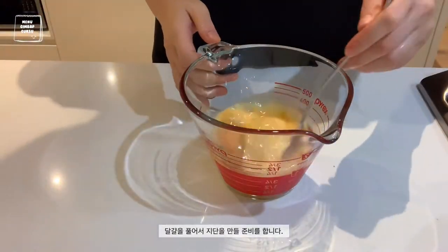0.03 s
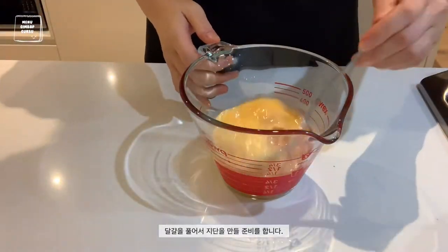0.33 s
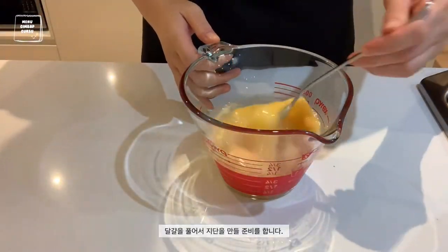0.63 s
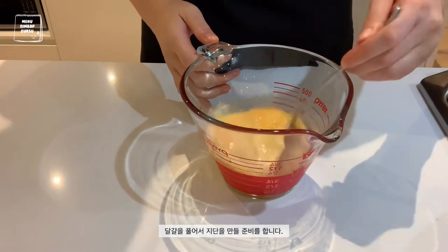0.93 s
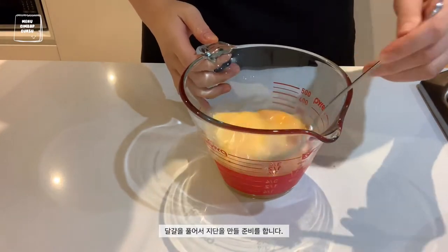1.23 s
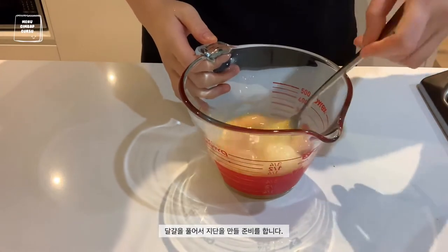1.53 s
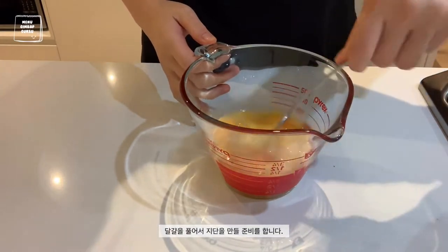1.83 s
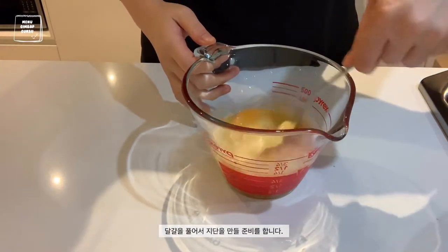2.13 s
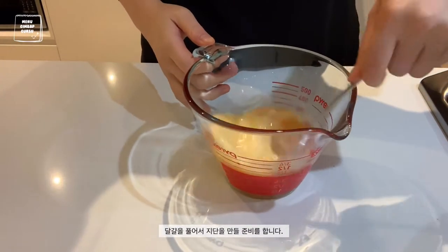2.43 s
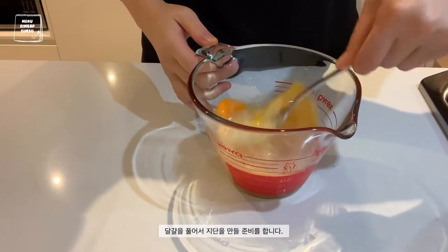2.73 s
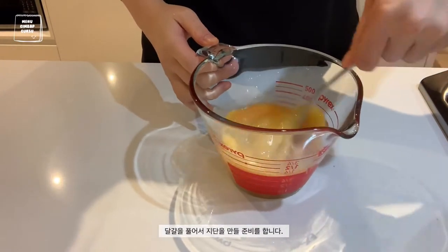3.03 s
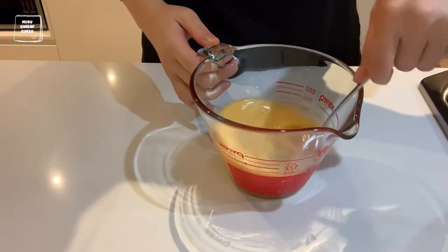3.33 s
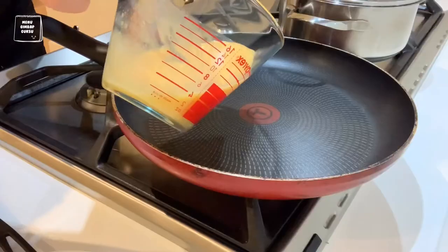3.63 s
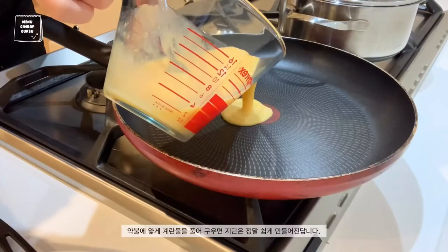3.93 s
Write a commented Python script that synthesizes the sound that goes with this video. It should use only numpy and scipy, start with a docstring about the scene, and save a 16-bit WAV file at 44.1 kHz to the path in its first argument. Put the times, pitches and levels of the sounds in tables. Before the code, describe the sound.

A steel fork beats eggs in a glass jug, then a stove hood rumbles.

```python
"""Close on a kitchen counter, in stereo: a steel fork beats eggs in a glass jug.
First loose stirring, a scrape at 0.6 s and clinks on the glass wall; from 2 s an even beat.
Each blow rings fork and glass, sloshes the egg and sends a low falling thud through the counter.
At 3.5 s the scene cuts to the stove: an extractor hood rumbles, then egg starts to sizzle in a pan."""
import sys
import numpy as np
from scipy import signal
from scipy.fft import rfft, irfft
from scipy.io import wavfile
from scipy.ndimage import uniform_filter1d

SR = 44100
rng = np.random.default_rng(int(sys.argv[2]) if len(sys.argv) > 2 else 0)


def generate_wav(signal):
    """Clip the signal to [-1, 1] and save it as 16-bit WAV at the path in sys.argv[1]."""
    frames = np.transpose(np.atleast_2d(signal))
    scaled = np.clip(frames, -1, 1) * 32767
    pcm = np.round(scaled).astype(np.int16)
    wavfile.write(sys.argv[1], SR, pcm)


N = 176400
DIRECT_LIKENESS = 0.12  # correlation of close sounds between the two microphones


# beating strokes on the bottom of the jug (time [s], level [dB], brightness [dB/octave],
# thud [dB], slosh [dB], crack against ring [dB], decay time [factor])
STROKES = [(2.0633, -11.5, 0.5, -21.5, -32.5, -9.5, 0.51), (2.2363, -14, -0.5, -25.5, -39, -14, 0.49),
           (2.4165, -14, -1, -21.5, -27.5, -10, 0.66), (2.6017, -14.5, -0.5, -24, -25.5, -10.5, 0.48),
           (2.7806, -15, 0, -25.5, -31, -9, 0.5), (2.9604, -16, 1, -24, -31.5, -14, 0.48),
           (3.1465, -17.5, -1, -26, -37.5, -8.5, 0.21), (3.3069, -14, -0.5, -22.5, -28, -11, 0.62),
           (3.4916, -13.5, 1.5, -18, -21.5, -10.5, 2.5)]
# clinks on the glass wall; the pitch depends on where the fork lands
# (time [s], level [dB], brightness [dB/octave], thud [dB], long ring [dB], pitch [factor])
CLINKS = [(0.6800, -15, -3.5, -27.5, -56, 1), (1.2259, -16, -2, -26, -41, 1.007),
          (1.25, -28, -10.5, -55, -38.5, 1), (1.2744, -22, 6.5, -34, -53, 1.04),
          (1.279, -15.5, -3, -32, -35, .985), (1.291, -30, -9, -65, -57, .98),
          (1.4675, -15.5, -1, -34, -50, 1.027), (1.4743, -17, -0.5, -52, -41, 1.01),
          (1.481, -19.5, -1, -45, -61, 1.01), (1.5111, -20, -3.5, -35.5, -51, .99),
          (1.5244, -16, 1.5, -40, -38, .995)]
# light touches of the tines, from clean pings to wet smacks
# (time [s], level [dB], brightness [dB/octave], thud [dB], crack against ring [dB])
TOUCHES = [(0.036, -39, -0.5, -45, 16), (0.166, -34.5, 6, -34, 2.5), (0.316, -38, 8.5, -47, -2),
           (0.349, -27, 2.5, -31, -6), (0.401, -39.5, 2, -43, 4), (0.499, -47.5, 4, -42, 19.5),
           (0.534, -37, 7, -36, 1), (0.557, -36.5, 3, -34, 1), (0.734, -31, -1, -32.5, 0),
           (0.8484, -31, 13, -39, -1), (0.896, -35, 0, -36, 5), (0.912, -37.5, -0.5, -48, -3),
           (1.054, -27.5, 14, -43, 28), (1.065, -28.5, -6, -46, -11), (1.092, -30.5, 3, -28, 4),
           (1.2083, -25.5, 7.5, -44, 0), (1.955, -33.5, -0.5, -40.5, 5.5), (2.04, -29.5, 4.5, -55, 5),
           (2.119, -24.5, 4, -32.5, -0.5), (2.307, -30, 0.5, -34, 7), (2.3662, -29, 5.5, -36, -8),
           (2.482, -29.5, -0.5, -39, -1), (2.5571, -27.5, 12, -39, -14), (2.585, -29, -5, -35, 5),
           (2.659, -28.5, -0.5, -30, 2), (2.732, -27.5, 10, -39, -13), (2.833, -30, 4, -32.5, -4),
           (2.9042, -28.5, 14, -36.5, -8), (3.023, -35, 1.5, -42, -1), (3.097, -41.5, 9, -67, -7),
           (3.186, -30.5, 10, -38, -9), (3.2586, -28, 7.5, -38, -8), (3.37, -30.5, -0.5, -35, -1),
           (3.430, -30.5, 0.5, -36, -2)]
def fork(tick_lead_s=.0045, tick_db=-17.5):
    """The fork hits the jug, near centre; a faint tick just before each stroke softens its attack."""
    out = np.zeros((2, N))
    stroke, clink, touch = range(3)
    for s, db, tilt, _, _, crack_db, decay in STROKES:
        add(out, s - tick_lead_s, amp(db + tick_db) * contact(stroke, tilt, crack_db))
        add(out, s, amp(db) * pan(0.6) * contact(stroke, tilt, crack_db, decay=decay))
    for s, db, tilt, _, ring_db, pitch in CLINKS:
        add(out, s, amp(db) * pan(1) * contact(clink, tilt, crack_db=-10, pitch=pitch))
        add(out, s, amp(ring_db) * glass_ring())
    for s, db, tilt, _, crack_db in TOUCHES:
        add(out, s, amp(db) * pan(2) * contact(touch, tilt, crack_db, crack_t60=0.042))
    return out


# modes of fork and jug (frequency [Hz], base t60 [s], weight in a stroke [dB], clink [dB], touch [dB])
JUG_MODES = [(1327, 0.19, -19, -12, -16), (1808.5, 0.088, -11.5, -9.5, -1), (2060, 0.047, -14, -0.5, -3.5),
             (2270, 0.063, -10.5, -1, -33), (2457, 0.092, -37, -38, -2), (3417, 0.12, -14, -9, -9.5),
             (4155, 0.067, -9.5, 7, -6), (4267, 0.056, -33, 6.5, -14.5), (4523, 0.024, -6.5, -13, -20),
             (5543, 0.068, -18, -16, -16), (6010, 0.041, -16.5, 0.5, -3), (6455, 0.031, -20, -7, -1),
             (8060, 0.053, -21.5, -14, -11.5), (9520, 0.017, -21.5, -10.5, -31),
             (10870, 0.015, -26.5, -5.5, -21.5)]
# the dry crack of contact (frequency [Hz], density [dB])
CRACK_SPECTRUM = [(200, -27.5), (420, -7.5), (750, 1.5), (2000, -13), (2900, -1.5), (4400, -1.5),
                  (7500, -2.5), (11000, -7), (14300, -4.5), (17000, -63)]
def contact(kind, tilt_db, crack_db, crack_t60=0.055, decay=1, pitch=1):
    """Steel meets glass: a gritty crack, and each mode split into close partials by the four tines."""
    attack_s, tine_spread_hz, pivot_hz, scatter_db = 0.00068, 50.4, 4500, 1.37
    t = seconds(.15)
    attack = 1 - np.exp(-(t / attack_s) ** 2)
    ring = np.zeros((2, len(t)))
    for hz, t60, *weights_db in JUG_MODES:
        detune, a, b, c, d = rng.standard_normal((5, 4))
        tines = np.exp(2j * np.pi * np.outer(hz * pitch + tine_spread_hz * detune, t))
        pickup = alike([a + 1j * b, c + 1j * d])  # each tine's size and phase at each microphone
        mode = (pickup @ tines).real
        db = weights_db[kind] + tilt_db * np.log2(hz / pivot_hz) + scatter_db * rng.standard_normal()
        ring += amp(db) * unit_energy(mode * attack * fade(t, t60 * decay))
    noise = alike(rng.standard_normal((2, len(t))))
    burst = noise * grit(len(t)) * attack * fade(t, crack_t60 * decay)
    crack = colour(burst, [(hz, db + tilt_db * np.log2(hz / pivot_hz)) for hz, db in CRACK_SPECTRUM])
    return unit_energy(unit_energy(ring) + amp(crack_db) * unit_energy(crack))


# long-lived modes of the glass (frequency [Hz], relative level [dB], t60 [s])
GLASS_MODES = [(2220, -8, 0.35), (2500, -6, 0.56), (2526, -2, 0.63), (4100, -6, 0.15), (4450, -5, 0.28),
               (6130, 2.5, 0.29)]
def glass_ring():
    """The jug sings on faintly after a clink; a close pair of modes beats."""
    t = seconds(.6)
    return sum(amp(db) * fade(t, t60) * np.sin(2 * np.pi * (hz * t + rng.random((2, 1))))
               for hz, db, t60 in GLASS_MODES)


# one scrape along the glass (time [s], level [dB])
DRAG_LEVEL = [(.607, -56), (.618, -30.5), (.68, -29.5), (.715, -38), (.76, -42.5), (.83, -59)]
# its hiss (frequency [Hz], density [dB])
DRAG_SPECTRUM = [(200, -5), (700, 2.5), (1500, 5.5), (4200, -3), (6500, 0.5), (9500, 10), (11500, 2),
                 (14000, 1), (17000, -40)]
# resonances of the dragged fork (frequency [Hz], width [Hz], relative level [dB])
DRAG_MODES = [(3430, 140, -10.5), (4970, 200, -17), (9640, 260, -11), (11240, 79, -5), (13300, 160, -6)]
def drag():
    """The tines stick and slip in gritty clumps along the wet glass and set the fork ringing."""
    t = np.arange(N) / SR
    slips = grains(per_s=3500, spread_db=-1) * grit(N)
    scrape = unit(unit(colour(slips, DRAG_SPECTRUM)) + resonances(slips, DRAG_MODES))
    touching = (t > DRAG_LEVEL[0][0]) & (t < DRAG_LEVEL[-1][0])
    return scrape * level(DRAG_LEVEL) * touching


BUBBLE_RISE_PER_S = 0.86  # upward glide of bubbles and glugs
# the egg swirling between blows (time [s], level [dB])
SWIRL_LEVEL = [(0, -55.5), (.55, -53.5), (.7, -40.5), (.9, -51.5), (1.17, -51), (1.28, -35.5),
               (1.45, -53.5), (2.0, -55.5), (2.1, -45), (3.5, -45)]
# egg sloshing in the jug (frequency [Hz], density [dB])
SLOSH_SPECTRUM = [(80, -55.5), (200, 10), (370, -0.5), (800, 0.5), (1400, -4.5), (2200, -5.5), (3200, -9),
                  (6000, -4.5), (15000, -25)]
# fine spray thrown up by the fork (frequency [Hz], density [dB])
SPRAY_SPECTRUM = [(500, -12), (1800, 1), (4000, 1), (8000, -20), (13000, -14), (16000, -12)]
def slosh(drops_per_s=800, churn_db=-3, spray_db=-9, peak_s=0.024):
    """Tiny bubbles, churning drops and spray swell after each stroke."""
    t = seconds(.25)
    short = t[:len(t) // 8]
    pitches_hz = np.geomspace(300, 3000, num=16)
    bubbles = 0
    for hz in pitches_hz:
        envelope = np.exp(-hz * short / 6) * (1 - short / short[-1])  # rings for about six cycles
        bubble = envelope * np.sin(2 * np.pi * hz * short * (1 + BUBBLE_RISE_PER_S * short))
        births = grains(drops_per_s / len(pitches_hz), spread_db=5)
        bubbles += np.sqrt(hz) * unit(signal.oaconvolve(births, bubble[None], axes=1)[:, :N])
    churn = unit(grains(drops_per_s, spread_db=5))
    wet = unit(colour(unit(bubbles) + amp(churn_db) * churn, SLOSH_SPECTRUM))
    spray = unit(colour(grains(per_s=1900, spread_db=1.5), SPRAY_SPECTRUM))
    swell = level(SWIRL_LEVEL)[None]
    for s, _, _, _, db, *_ in STROKES:
        add(swell, s, amp(db) * hump(t, peak_s) ** 2.25)
    return (wet + amp(spray_db) * spray) * swell


# air pockets in the egg, from glugs to tiny pops (time [s], level [dB], starting pitch [Hz])
GLUGS = [(0.036, -39.5, 465), (0.092, -38, 1820), (0.120, -37.5, 586), (0.136, -39, 1296),
         (0.168, -31.5, 1334), (0.317, -28.5, 2216), (0.458, -32, 4440), (0.562, -34, 1160),
         (0.868, -35, 674), (1.064, -26, 1867), (1.716, -38, 13400), (1.887, -39, 9900),
         (2.041, -21.5, 1125), (2.205, -25.5, 1760), (2.452, -24.5, 538), (2.583, -22, 723),
         (2.625, -20, 866), (2.624, -19.5, 2150), (2.80, -28, 1080), (2.848, -28.5, 1014),
         (2.937, -32, 1370), (2.985, -24.5, 800), (3.099, -24, 847), (3.336, -16.5, 734)]
def glugs(attack_s=0.0034):
    """Air pockets close and ring with a rising pitch; smaller, higher ones die sooner."""
    out, t = np.zeros((2, N)), seconds(.25)
    for s, db, hz in GLUGS:
        turns = hz * t * (1 + BUBBLE_RISE_PER_S * t / 2) + rng.random((2, 1)) / 4
        envelope = np.minimum(t / attack_s, 1) * fade(t, t60=0.06 * np.sqrt(850 / hz))
        add(out, s, amp(db) * envelope * np.sin(2 * np.pi * turns))
    return out


# jug and hand nudge the counter (time [s], level [dB], pitch [Hz])
NUDGES = [(0.736, -25.5, 62.3), (0.926, -36, 71), (1.716, -36, 61.5)]
# what the counter and its cabinet add to a thud (frequency [Hz], density [dB])
CABINET_SPECTRUM = [(30, -36.5), (70, 13.5), (120, 3), (250, -4), (450, -21.5), (2000, -63)]
def counter(lag_s=.003, rumble_db=-3, nudge_rise_s=0.013, right_db=-5.2):
    """Each contact thuds through the counter and nudges rock it, louder at the left microphone."""
    top_hz, end_hz, fall_s, rise_s, pitch_spread = 222, 70, .013, .0045, 0.082
    out, t = np.zeros((2, N)), seconds(.25)
    # the pitch falls, since the counter carries high notes faster than low ones
    hz = end_hz + (top_hz - end_hz) * np.exp(-t / fall_s)
    envelope = (1 - np.exp(-t / rise_s)) * fade(t, t60=.14)
    envelope /= envelope.max()
    for s, _, _, db, *_ in STROKES + CLINKS + TOUCHES:
        pitch = 1 + pitch_spread * rng.standard_normal()
        thud = -np.sin(2 * np.pi * np.cumsum(hz) / SR * pitch)
        rumble = unit(colour(rng.standard_normal((1, len(t))), CABINET_SPECTRUM))
        add(out, s + lag_s, amp(db) * (thud + amp(rumble_db) * rumble) * envelope)
    for s, db, nudge_hz in NUDGES:
        add(out, s, amp(db) * hump(t, nudge_rise_s) * np.sin(2 * np.pi * nudge_hz * t))
    return out * amp([[0], [right_db]])


# at the stove, the egg starts to fry (time [s], level [dB])
SIZZLE_LEVEL = [(3.5, -57), (3.76, -53), (3.83, -34.5), (3.9, -32), (4.0, -30.5)]
# its hiss (frequency [Hz], density [dB])
SIZZLE_SPECTRUM = [(410, -22), (700, -2), (2220, -1), (2400, -4), (3460, -13.5), (6740, -8.5), (7290, -22),
                   (8880, -7.5), (13500, -16), (16000, -87)]
# resonances of the frying pan (frequency [Hz], width [Hz], relative level [dB])
PAN_MODES = [(1980, 66, -13), (2390, 29, -6), (2836, 51, -8.5), (3800, 150, -14), (5840, 260, -40),
             (9500, 500, -24)]
def sizzle():
    """Thousands of tiny pops ring the pan and carry into the kitchen."""
    pops = grains(per_s=7000, spread_db=3)
    frying = unit(colour(pops, SIZZLE_SPECTRUM)) + resonances(pops, PAN_MODES)
    return level(SIZZLE_LEVEL) * unit(kitchen(frying))


# hum of the extractor hood (frequency [Hz], level [dB])
HOOD_HUM = [(102.3, -41.5), (174, -37), (492, -43), (538, -48)]
# its rumble (frequency [Hz], density [dB])
HOOD_SPECTRUM = [(20, -29), (45, -11), (70, -4.5), (105, 1.5), (145, -6.5), (175, 0), (225, -2), (300, -12),
                 (400, -15), (530, -7.5), (850, -18.5), (1400, -22.5), (5000, -34.5), (12500, -45.5),
                 (16000, -75)]
def hood(rumble_db=-26):
    """The extractor over the stove: a diffuse rumble, and a steady hum left of centre."""
    t = np.arange(N) / SR
    hum = sum(amp(db) * unit(np.sin(2 * np.pi * (hz * t + rng.random()))) for hz, db in HOOD_HUM)
    return amp(rumble_db) * diffuse_noise(HOOD_SPECTRUM) + pan(5) * hum


# reverberation of the kitchen (frequency [Hz], t60 [s])
KITCHEN_DECAY = [(100, 0.5), (500, 1.0), (1400, 1), (4000, 0.56), (9000, 0.95), (15000, 0.27)]
def kitchen(direct, early_db=-7.5, tail_db=-15, early_s=0.025):
    """After the direct sound come near reflections off counter and walls, then a diffuse tail."""
    t = seconds(.7)
    hz, frames, bands = signal.stft(alike(rng.standard_normal((2, len(t)))), SR, nperseg=256)
    bands *= fade(frames, at_hz(KITCHEN_DECAY, hz)[:, None])
    tail = signal.istft(bands, SR, nperseg=256)[1][:, :len(t)] * np.minimum(t / early_s, 1)
    echoes = rng.standard_normal((2, len(t))) * (rng.random((2, len(t))) < .03)
    early = echoes * (t > .003) * np.exp(-2 * t / early_s)
    response = sum(amp(db) * part / np.linalg.norm(part, axis=1, keepdims=True)
                   for db, part in [(tail_db, tail), (early_db, early)])
    return direct + signal.fftconvolve(direct, response, axes=1)[:, :N]


# background at the counter (frequency [Hz], density [dB])
ROOM_TONE_SPECTRUM = [(20, -33), (45, -4.5), (90, 6.5), (170, -7.5), (350, -10), (550, -4), (1000, -33),
                      (7000, -19.5), (13500, -33), (16000, -66)]
def room_tone(db=-50.5):
    """The quiet kitchen, all around the microphones."""
    return amp(db) * diffuse_noise(ROOM_TONE_SPECTRUM)


# the microphone pair in diffuse sound (frequency [Hz], correlation [ratio, clipped at 1])
PAIR_LIKENESS = [(60, 13), (170, 0.15), (350, 0.36), (800, -0.17), (4000, 0)]
# its balance (frequency [Hz], left minus right [dB])
PAIR_BALANCE = [(60, 5.5), (160, 5.5), (300, 0), (1000, -1.5), (10000, 2)]
def diffuse_noise(spectrum):
    """Steady noise at the microphone pair; the deep bass is alike in both and leans left."""
    hz = np.fft.rfftfreq(N, 1 / SR)
    noise = alike(rfft(rng.standard_normal((2, N))), at_hz(PAIR_LIKENESS, hz))
    balance_db = np.outer([1, -1], at_hz(PAIR_BALANCE, hz)) / 2
    return unit(irfft(noise * amp(at_hz(spectrum, hz) + balance_db), N))


def grains(per_s, spread_db):
    """Random clicks of uneven size."""
    sizes = amp(spread_db * np.minimum(rng.exponential(1, (2, N)), 4)) * rng.choice([-1, 1], (2, N))
    return alike(sizes * (rng.random((2, N)) < per_s / SR))


def grit(samples, spread_db=4.5, grain_s=.0008):
    """Wet contact is gritty: its gain jumps from grain to grain."""
    return amp(spread_db * unit(uniform_filter1d(rng.standard_normal(samples), round(grain_s * SR))))


def resonances(x, modes):
    """Sends a sound through a bank of resonances."""
    return sum(amp(db) * unit(signal.lfilter(*signal.iirpeak(hz, hz / width, SR), x))
               for hz, width, db in modes)


def colour(x, spectrum, size=2048):
    """Minimum-phase filter with the given spectrum."""
    gain = amp(at_hz(spectrum, np.fft.rfftfreq(size, 1 / SR)))
    cepstrum = irfft(np.log(gain))
    cepstrum[1:size // 2] *= 2
    cepstrum[size // 2 + 1:] = 0
    response = irfft(np.exp(rfft(cepstrum)))
    return signal.fftconvolve(x, response[None], axes=1)[:, :x.shape[1]]


def alike(pair, likeness=DIRECT_LIKENESS):
    """Makes two unrelated channels partly alike."""
    c = np.clip(likeness, -1, 1)
    return np.array([pair[0], c * pair[0] + np.sqrt(1 - c ** 2) * pair[1]])


def amp(db):
    """Decibels to gain."""
    return 10 ** (np.asarray(db) / 20)


def fade(t, t60):
    """Falls by 60 dB every t60 seconds."""
    return amp(-60 * t / t60)


def hump(t, peak_s):
    """Rises to 1 at peak_s, then dies away."""
    return t / peak_s * np.exp(1 - t / peak_s)


def unit(x):
    """Scales to rms 1."""
    return x / np.sqrt(np.mean(x ** 2) + 1e-20)


def unit_energy(x):
    """Scales each channel to the energy of 10 ms at rms 1."""
    return x / np.sqrt(np.sum(x ** 2, -1, keepdims=True) / (.01 * SR) + 1e-20)


def seconds(length):
    """A time axis."""
    return np.arange(int(length * SR)) / SR


def at_hz(points, hz):
    """Reads a curve on a log-frequency axis."""
    f, value = np.transpose(points)
    return np.interp(np.log(hz + 1), np.log(f + 1), value)


def level(points):
    """A gain curve from (time [s], level [dB]) points."""
    return amp(np.interp(np.arange(N) / SR, *np.transpose(points)))


def pan(db):
    """Channel gains, with the left db above the right."""
    return amp(np.array([[db], [-db]]) / 2)


def add(mix, s, sound):
    """Mixes a sound in at s seconds."""
    part = mix[:, max(round(s * SR), 0):][:, :sound.shape[-1]]
    part += sound[..., :part.shape[1]]


def scene(cut_s=3.5, crossfade_s=0.007):
    """At the counter for the beating, then a hard cut to the stove."""
    beating = kitchen(fork() + drag() + slosh() + glugs() + counter()) + room_tone()
    stove = sizzle() + hood()
    cut = np.clip((np.arange(N) / SR - cut_s) / crossfade_s + .5, 0, 1)
    return beating * (1 - cut) + stove * cut


def record(dry, edge_hz=16200):
    """Clips at full scale and removes the highest treble."""
    lowpass = signal.firwin(255, edge_hz, window=("kaiser", 9), fs=SR)
    return signal.oaconvolve(np.clip(dry, -1, 1), lowpass[None], "same")


dry = scene()
out = record(dry)
generate_wav(out)
```